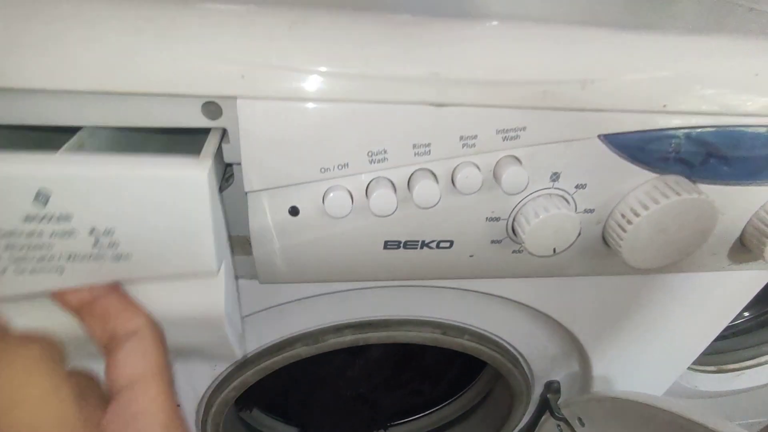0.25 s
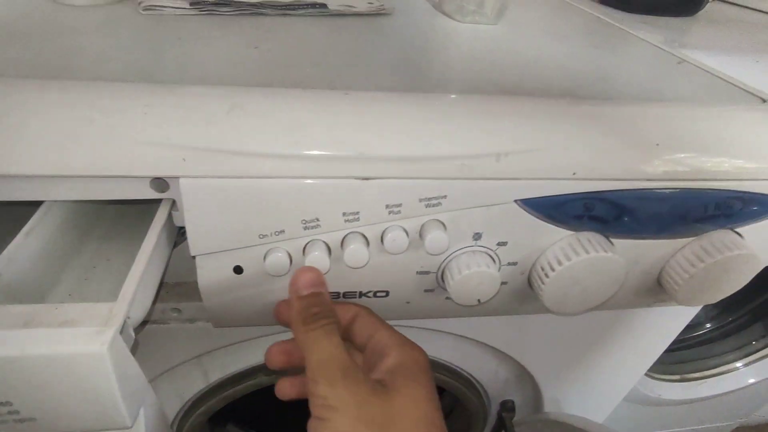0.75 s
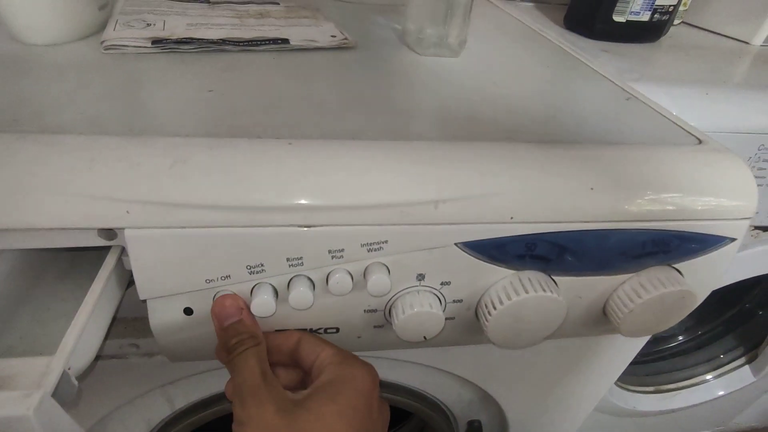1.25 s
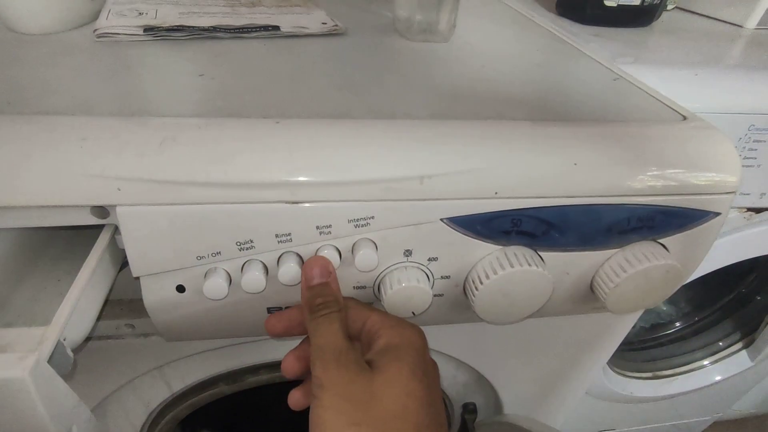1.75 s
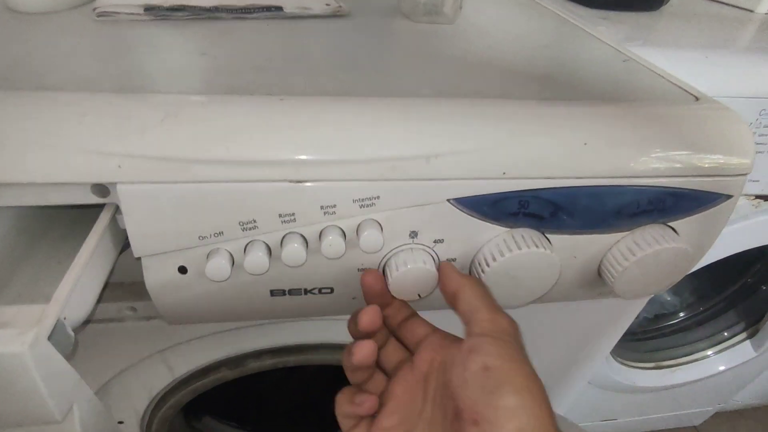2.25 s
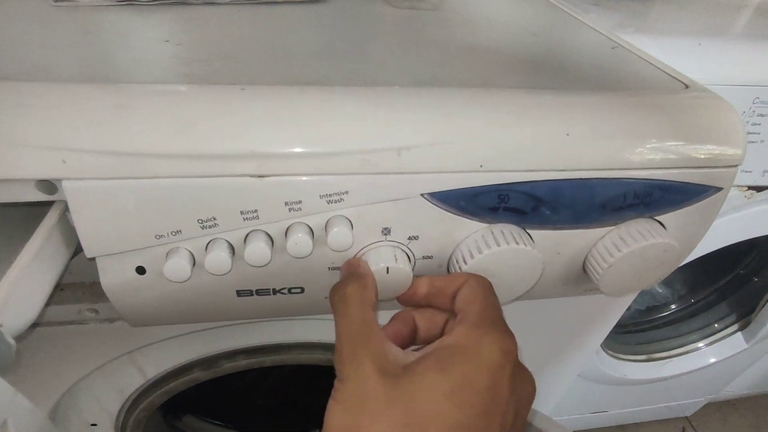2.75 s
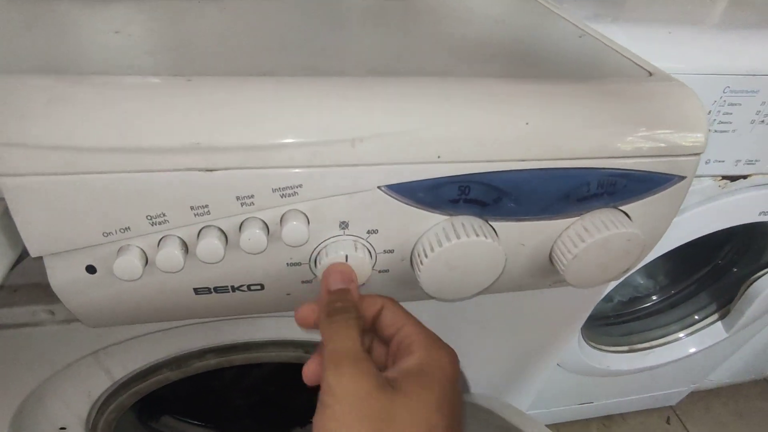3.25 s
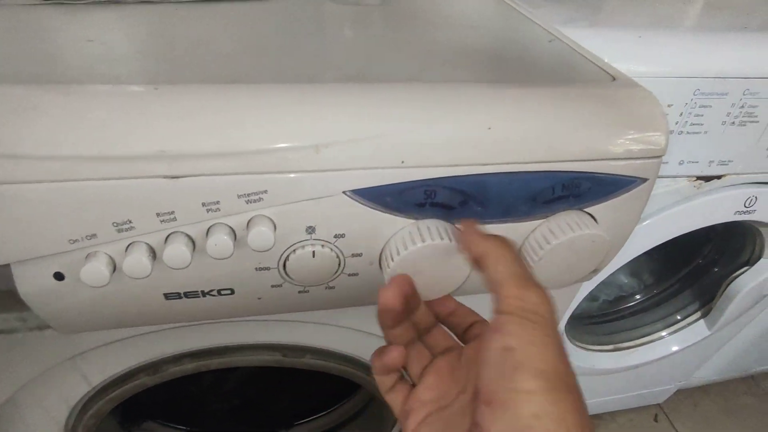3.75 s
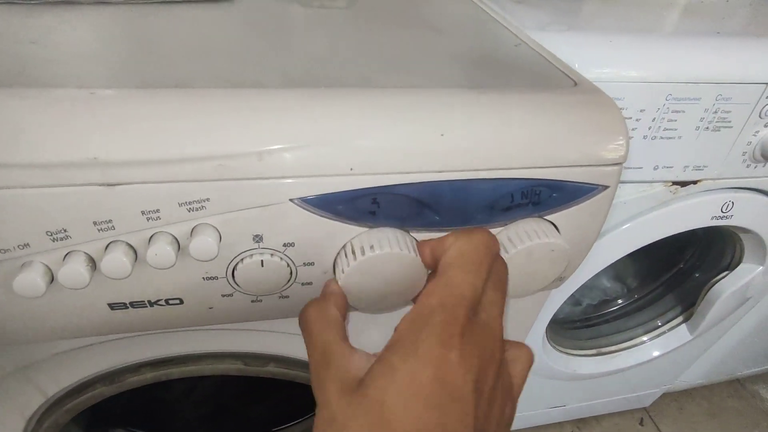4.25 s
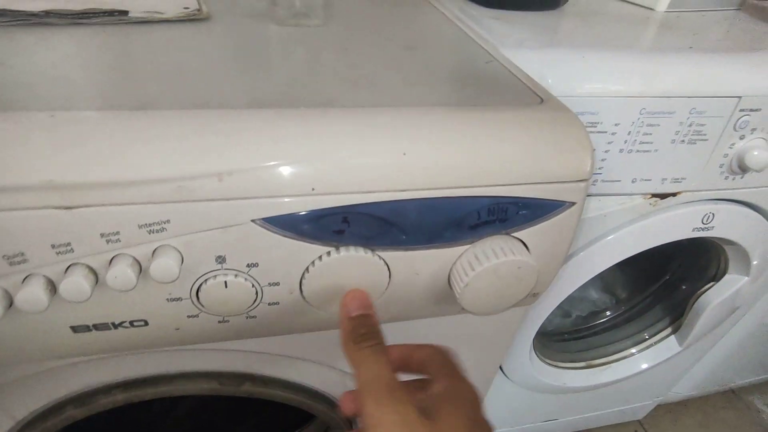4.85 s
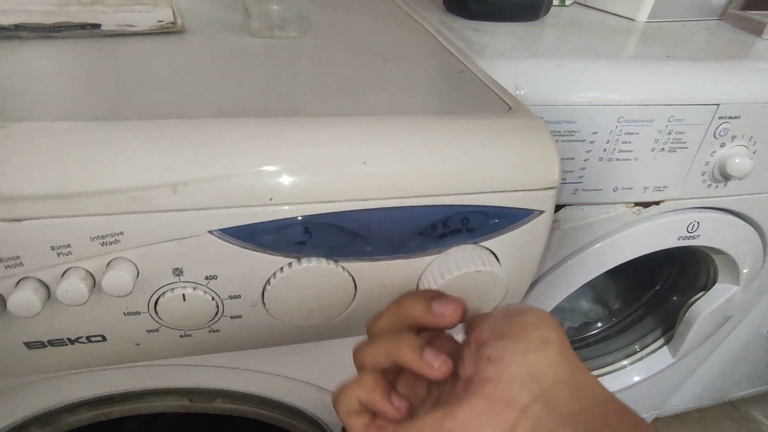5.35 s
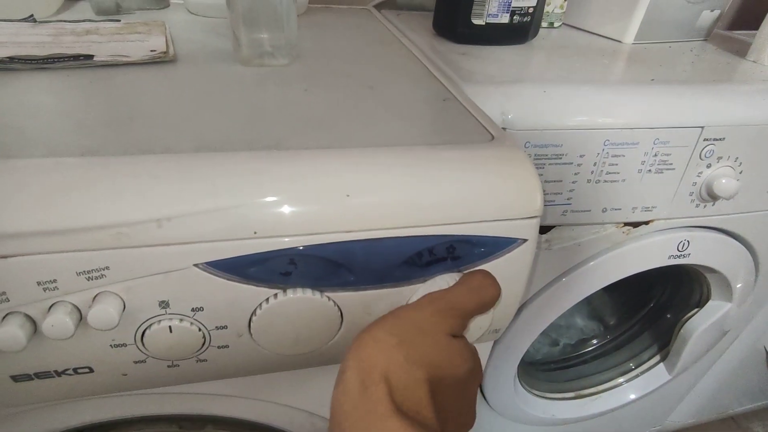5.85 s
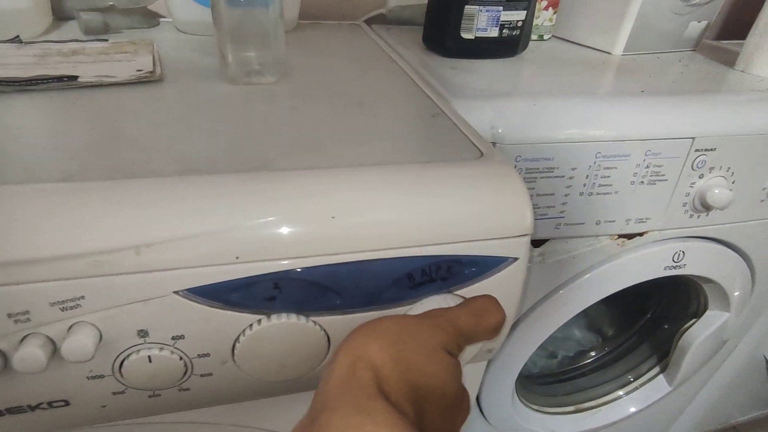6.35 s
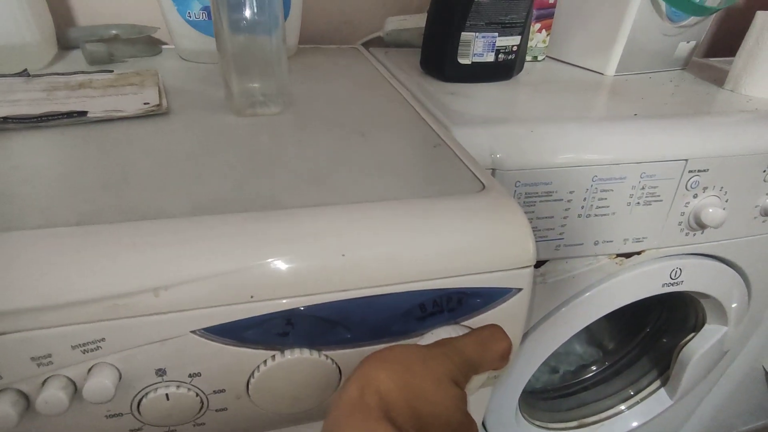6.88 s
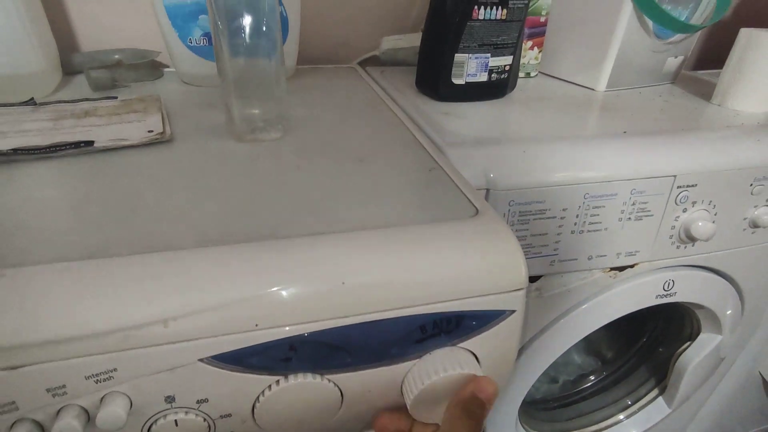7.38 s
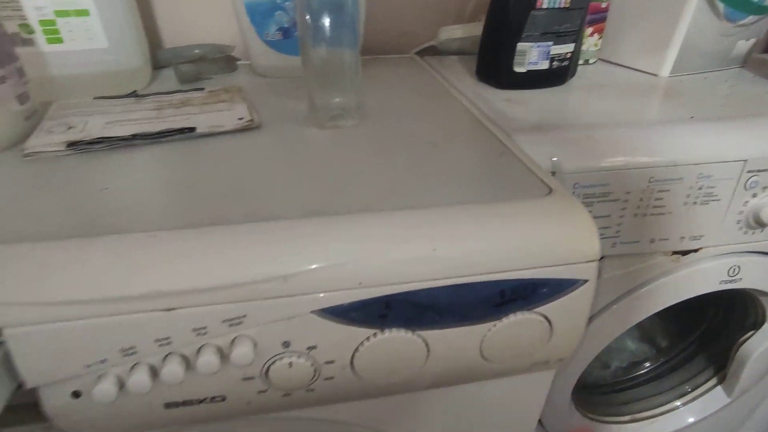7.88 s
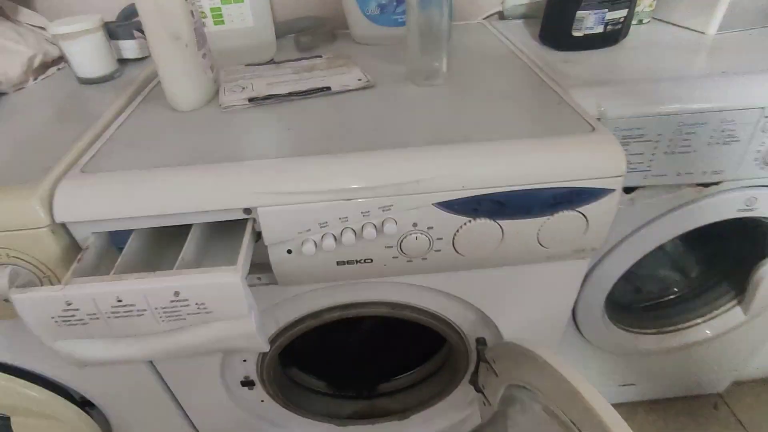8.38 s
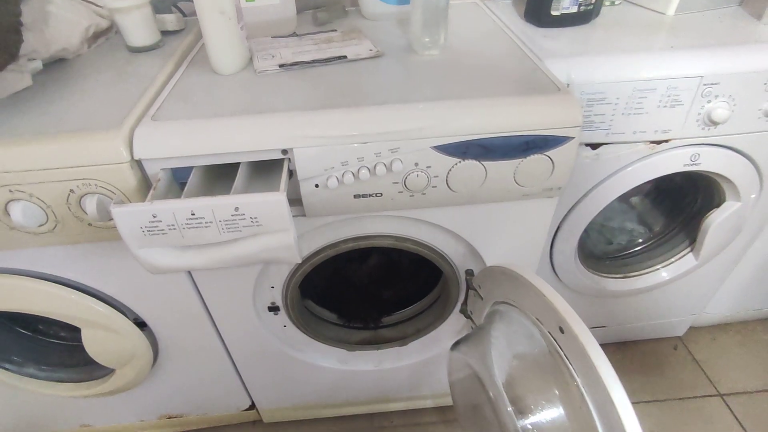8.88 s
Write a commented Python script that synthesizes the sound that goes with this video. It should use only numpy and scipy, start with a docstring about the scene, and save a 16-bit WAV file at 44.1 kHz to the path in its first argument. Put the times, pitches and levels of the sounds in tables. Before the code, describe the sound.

Close-up washing machine controls: soap drawer slides out, buttons snap, knobs click sharply and clunk in a small hard room, ending with slipper scuffs.

```python
"""Snaps, dull knocks and scrapes, close up: a hand pulls out a washing machine's soap drawer,
presses its buttons and turns its three knobs; at the end slippers scuff on the tiles.
Contacts are noise bursts that ring the modes of plastic fascia and steel cabinet or drawer; slides and
soles are shaped grains of noise. A small hard room answers, over quiet background noise and a low drone."""
import sys
import numpy as np
from scipy import signal
from scipy.fft import rfft, irfft, next_fast_len
from scipy.io import wavfile
from scipy.ndimage import map_coordinates

SR = 44100
rng = np.random.default_rng(int(sys.argv[2]) if len(sys.argv) > 2 else 0)


def put_to_file(sound):
    """Save the sound as 16-bit audio at rate SR, in the file named by the first command-line argument."""
    columns = np.atleast_2d(sound).T  # one column per channel
    safe = np.clip(columns, -1, 1)
    whole_steps = np.round(safe * 32767)
    wavfile.write(sys.argv[1], SR, whole_steps.astype(np.int16))


N = 402191

# modes of the plastic front, before the struck spot favours some: f/Hz, level/dB, t60/s
FASCIA_MODES = [(612, -8, 0.064), (647.6, -7, 0.17), (718, 5, 0.028), (815, -5, 0.036), (923, 1.5, 0.033),
                (1024, -3.5, 0.048), (1060, -8.5, 0.04), (1140, 2, 0.015), (1353, 1.5, 0.028),
                (1560, 4, 0.032), (1690, 3, 0.031), (1940, -3.5, 0.016), (2340, -14.5, 0.019)]
# modes of the steel box, likewise: f/Hz, level/dB, t60/s
CABINET_MODES = [(134.4, -5.5, 0.36), (165, -13.5, 0.038), (213.2, -4, 0.32), (254.2, -4.5, 0.15),
                 (293.8, -6, 0.14), (334.5, -6, 0.13), (373.2, -3, 0.082), (431.4, -3, 0.1)]
# modes of the soap drawer's box, likewise: f/Hz, level/dB, t60/s
DRAWER_MODES = [(121.4, -6, 0.28), (196, -2, 0.085), (240.7, 4, 0.125), (281, 1.5, 0.12), (309, 0, 0.1),
                (436, -8, 0.025)]
DRAWER_OUT = .6  # the drawer is left alone after this moment (s)
DRUM, TRAY, DIAL, TIMER = 214, 361, 652, 689  # pitches of long thin rings (Hz)
THROB = 27  # beat rate of the timer's ring (Hz)


def amp(db):
    """Gain of a level in dB."""
    return 10 ** (np.asarray(db) / 20)


def unit(x):
    """x at rms 1."""
    return x / np.sqrt(np.mean(x ** 2) + 1e-20)


def along(points, hz):
    """Values at hz, read from (Hz, value) points on a log frequency axis."""
    f, v = np.transpose(points)
    return np.interp(np.log(hz + 1), np.log(f + 1), v)


def curves(rows):
    """One value per sample for each column after the time."""
    s, *cols = np.transpose(rows)
    return [np.interp(np.arange(N) / SR, s, c) for c in cols]


def wobble(rate):
    """A smooth random curve with rate knots a second."""
    knots = rng.standard_normal(int(N * rate / SR) + 4)
    return map_coordinates(knots, [np.arange(N) * rate / SR])


def filtered(x, response):
    """x times a complex response of frequency, with padding for the ringing."""
    n = x.shape[-1]
    m = next_fast_len(n + min(n // 2, 16384))
    return irfft(rfft(x, m) * response(np.fft.rfftfreq(m, 1 / SR)), m)[..., :n]


def resonance(f, hz, width):
    """Response of a causal resonance at hz with peak gain 1."""
    return 1j * f * width / (hz * hz - f * f + 1j * f * width)


def diffuse(pair, spectrum):
    """Colour two signals and blend them so that left and right agree in the bass and part in the treble."""
    # diffuse sound at two microphones: f/Hz, left-right likeness (1 = identical)
    likeness = [(60, 0.98), (250, .8), (600, 0.36), (1400, 0.18), (3000, .02)]

    def blend(hz):
        turn = np.arccos(np.clip(along(likeness, hz), -1, 1)) / 2
        return amp(along(spectrum, hz)) * [np.cos(turn), np.sin(turn)]
    mid, side = filtered(pair, blend)
    return np.array([mid + side, mid - side])


def struck(modes, t, attack, scatter_db, octave_db):
    """A body to strike: modes near the struck spot's pitch ring most; each blow draws strengths and phases."""
    hz, db, t60 = np.transpose(modes)
    dying = amp(-60 * t / t60[:, None]) * np.exp(2j * np.pi * hz[:, None] * t)
    dying = dying * (1 - np.exp(-t / attack))

    def blow(centre_hz):
        """One blow at peak 1; modes lose octave_db for each octave from centre_hz."""
        draw = rng.standard_normal((2, len(hz)))
        mode_db = db + scatter_db * draw[0] - octave_db * np.abs(np.log2(hz / centre_hz))
        x = np.imag((amp(mode_db) * np.exp(1j * draw[1])) @ dying)
        return x / np.max(np.abs(x))
    return blow


def stroke(start, swell, fade, db, swell_db, landing):
    """Samples and gain of a rubbing stroke: it lands, swells to a rounded top and fades."""
    FADE_DB, BEND = 28.5, 1.23  # depth of the fade; roundness of the top
    first, last = round(start * SR), min(N, round((start + swell + fade) * SR))
    t = np.arange(first, last) / SR - start - swell  # 0 at the top
    rising = swell_db * np.abs(t / swell) ** BEND
    falling = FADE_DB * np.abs(t / fade) ** BEND
    gain = amp(db - np.where(t < 0, rising, falling)) * np.clip((t + swell) / landing, 0, 1) ** 2
    return slice(first, first + len(t)), gain


def contacts():
    """Each contact is a rattling snap, a dull knock, the part's own ring and the modes of the bodies it hits."""
    # contacts of drawer, buttons, detents and fingers; the last is a tick of grit underfoot.
    # Levels before panning: t/s, snap peak/dB, snap colour f/Hz, fascia re snap/dB,
    # fascia spot f/Hz, cabinet or drawer re snap/dB
    hits = [(0.0819, -36.5, 6500, -18, 587, -19), (0.0947, -35.5, 2850, -7, 552, 1),
            (0.111, -42, 3840, 14.5, 990, 10), (0.2434, -17, 3420, -6.5, 880, -12.5),
            (0.4109, -48.5, 3850, 6, 1590, 14.5), (.452, -41, 3000, -2.5, 1600, 1),
            (0.4703, -56.5, 3970, -12, 821, 21.5), (0.7915, -45, 2340, 8, 710, -4.5),
            (1.0577, -58, 4290, 7, 950, -12), (1.084, -64, 2310, 16.5, 923, -9),
            (1.2055, -67, 3000, 8, 940, -6), (1.2314, -43.5, 3900, -0.5, 940, -27),
            (1.261, -57, 3020, 6.5, 900, -3), (1.28, -46.5, 4000, -0.5, 953, -21),
            (1.292, -46.5, 5310, -10, 1030, -7), (1.319, -47.5, 4000, 7.5, 940, 0),
            (1.425, -50.5, 3740, 9.5, 961, -12), (1.4494, -32.5, 5160, -8, 955, -32),
            (1.468, -11.5, 3890, -4, 825, -25.5), (1.8733, -42.5, 4640, -5.5, 651, -4.5),
            (1.8983, -41.5, 2340, 10.5, 687, -1.5), (1.9942, -46, 2690, 10, 917, 8.5),
            (2.0504, -25, 3225, -25, 616, -10), (2.0532, -18, 3420, -5.5, 665, -19.5),
            (2.3019, -58, 3610, 7.5, 647, 5), (2.3492, -48, 2460, 4.5, 670, -7),
            (2.37, -34.5, 2893, -1, 881, -9.5), (2.4621, -19.5, 3460, 2.5, 1205, -13),
            (2.4667, -3.5, 3300, -12.5, 1060, -29.5), (2.5025, -13, 3424, -0.5, 867, -13.5),
            (2.5075, -10.5, 4020, -10, 994, -28.5), (2.6361, -10.5, 4033, -3.5, 1140, -19.5),
            (2.7264, -7.5, 3274, -13.5, 1730, -28), (2.733, -11, 3280, -6.5, 1500, -23),
            (2.7426, -18, 3530, 0, 704, -17.5), (3.0131, -61, 2180, 15.5, 659, 19.5),
            (3.0603, -48, 2570, 10, 918, 5), (3.1284, -36, 6660, -9, 670, -15),
            (3.2899, -41, 3000, 10, 895, 3.5), (3.378, -15, 2260, -9, 895, -17.5),
            (3.497, -24, 7190, -9, 688, -11), (3.59, -36.5, 4480, -1, 670, 1), (3.78, -54, 3730, 6, 690, 5),
            (3.8468, -56, 6340, 13, 675, 21), (3.9493, -44, 3660, 16.5, 640, 10),
            (3.9982, -44, 3000, 6.5, 500, 10), (4.0095, -38.5, 3050, 10, 641, -4),
            (4.0593, -35, 4000, -3.5, 800, -2.5), (4.0895, -26.5, 4000, 1, 773, -12.5),
            (4.11, -28.5, 4550, 0.5, 770, -5.5), (4.1655, -22.5, 4200, -9, 900, -18),
            (4.182, -31.5, 3980, 3, 700, -4), (4.2592, -27.5, 7480, -5.5, 1610, -20),
            (4.2748, -23.5, 3380, 2.5, 711, 0.5), (4.311, -38, 3780, 12, 700, 7.5),
            (4.4132, -48, 2270, 9.5, 656, -9.5), (4.473, -50.5, 4390, 12.5, 884, 10),
            (4.686, -43.5, 2300, 15.5, 646, 14.5), (4.6935, -25, 2260, 9.5, 947, -9),
            (4.6973, -27, 1704, 7, 953, 4.5), (4.748, -37, 3000, 9.5, 700, 7.5),
            (4.7701, -12, 6820, -13.5, 646, -25.5), (4.7745, -30.5, 3040, 12, 680, 0),
            (4.789, -35.5, 3000, 5.5, 600, 7.5), (4.845, -18.5, 6940, -20.5, 665, -15),
            (4.857, -26.5, 3165, 4, 900, -7), (5.1225, -46, 2360, 3, 977, 0),
            (5.2407, -32.5, 2910, 2, 748, -19.5), (5.2597, -17, 6360, -5.5, 764, -17.5),
            (5.2754, -7.5, 2976, -6.5, 996, -16.5), (5.2976, -20.5, 3110, 1.5, 744, -9),
            (5.3436, -14, 3910, -3, 651, -3), (5.565, -44.5, 3900, -1, 683, -0.5),
            (5.791, -49.5, 3560, 3, 684, 2), (5.862, -56.5, 2790, 10.5, 656, 11),
            (5.9828, -22.5, 5540, -4.5, 1482, -13.5), (5.991, -24, 3490, -0.5, 1650, -9),
            (6.112, -24.5, 8600, -10, 1030, -38), (6.1331, -26, 2220, -5.5, 680, -28),
            (6.202, -22.5, 6270, 1.5, 1060, -9.5), (6.376, -39.5, 2510, 3, 900, 1),
            (6.3864, -19.5, 2357, -3, 940, -20), (6.4149, -19.5, 2930, -2, 1060, -8.5),
            (6.4229, -27.5, 3000, -7, 1060, -5), (6.849, -71, 3000, 11, 900, 1),
            (6.9118, -65, 4970, 6.5, 643, 9), (7.0123, -51, 2510, 1.5, 579, 7),
            (7.0474, -34, 3950, -2.5, 668, -13.5), (7.062, -19, 5750, -18.5, 1060, -39.5),
            (7.293, -46.5, 3860, -4, 714, -9.5), (7.3721, -39, 4000, 4, 742, -1),
            (7.5001, -54.5, 2990, 11, 700, 9), (7.5323, -36.5, 2490, 9.5, 700, 9.5),
            (7.606, -8.5, 4470, -5, 715, -18.5), (7.611, -28, 3000, -1.5, 900, -5.5),
            (7.721, -21.5, 9170, -18, 740, -11), (8.74, -36.5, 3560, -31, 1594, -36)]
    # the part in hand from each time on: from t/s, cabinet or drawer spot f/Hz,
    # top re snap/dB (for a -26.5 dB snap), snap t60/s, snap rise/s, upper edge f/Hz (for a -24.5 dB snap),
    # mean right over left/dB, own ring f/Hz, its width/Hz, its level re fascia/dB, dull knock re fascia/dB
    parts = [(0, 248, -19.5, 0.02, 0.0012, 8000, 8.5, 990, 200, -11, -8.5),
             (.6, 217, 1, 0.028, 0.002, 6000, 3.5, 1390, 250, 0.5, -2),
             (.9, 217, -3.5, 0.034, 0.00044, 8000, 5, 923, 70.5, 0, -12),
             (1.46, 220, -3.5, 0.05, 0.00058, 8030, 4, 720, 202.6, -6, -16),
             (1.7, 215, -2.5, 0.053, 0.00079, 7950, 4, 695, 120, -9, -10),
             (2.25, 416, -18, 0.028, 0.00058, 7900, 2.5, 1154, 204, -12, -1.5),
             (3.7, 253, -10.5, 0.028, 0.0014, 9000, 4.5, 750, 250, -17, -6.5),
             (4.6, 214, -17, 0.017, 0.00041, 11800, 4.5, 920, 100.5, -12.5, -1),
             (5.1, 304, -7.5, 0.028, 0.0012, 10000, 3.5, 1068, 80, -6, -14.5),
             (5.9, 340, -10, 0.036, 0.0035, 7900, 5, 1038, 70, -1.5, -8.5),
             (7.25, 325, 3, 0.023, 0.00056, 10000, 2.5, 688, 160, -9, -2)]
    TOP_PER_DB = 0.12  # dB of extra top for each dB of snap
    DULLER_PER_DB = 0.1  # octaves the upper edge drops for each dB softer
    out, t = np.zeros((2, N + SR)), np.arange(SR // 3) / SR
    short = t[:3072]
    fascia = struck(FASCIA_MODES, t, 0.00069, 2.8, 10.1)
    cabinet = struck(CABINET_MODES, t, 0.0026, 2.5, 8)
    drawer = struck(DRAWER_MODES, t, 0.0051, 2.9, 13)
    for s, db, hz, fascia_db, fascia_hz, body_db in hits:
        part = [row for row in parts if row[0] <= s][-1]
        _, body_hz, top_db, t60, rise, sharp_hz, pan_db, own_hz, own_width, own_db, knock_db = part
        top_db += TOP_PER_DB * (db + 26.5)
        edge_hz = sharp_hz * 2 ** (DULLER_PER_DB * (db + 24.5))  # soft contacts are dull

        decay = amp(-60 * short / t60) + 0.39 * amp(-60 * short / 0.0015)
        burst = rng.standard_normal((3, len(short))) * decay * (1 - np.exp(-short / rise))
        burst = burst[0] + 2.54 * burst[1:]  # left and right face different sides of the part

        def snap_colour(f):
            body = 0.58 * (4000 / hz) ** 0.31 * resonance(f, 1700, 4800)
            peaks = body + resonance(f, hz, hz / 2) + amp(top_db) * resonance(f, 8400, 4100)
            return peaks * f / (f - 1500j) / (1 + 1j * f / edge_hz) / (1 + 1j * f / 11000)
        snap = filtered(burst, snap_colour)
        knock = filtered(burst, lambda f: resonance(f, fascia_hz, 1.4 * fascia_hz) ** 2)
        own = filtered(burst[0], lambda f: resonance(f, own_hz, own_width))

        # on average louder on the right, with some scatter
        side = amp((pan_db / 2 + 0.63 * rng.standard_normal()) * np.array([[-1], [1]]))
        at = round(s * SR)
        brief, ringing = out[:, at:at + len(short)], out[:, at:at + len(t)]
        brief += amp(db) * side * snap / np.max(np.abs(snap))
        brief += amp(db + fascia_db + knock_db) * side ** 0.97 * knock / np.max(np.abs(knock))
        brief += amp(db + fascia_db + own_db) * side * own / np.max(np.abs(own))
        ringing += amp(db + fascia_db) * side ** 1.4 * fascia(fascia_hz)
        body = drawer if s < DRAWER_OUT else cabinet
        ringing += amp(db + body_db) * body(body_hz)
    return out[:, :N]


def pawl():
    """A hard pawl clicks as a knob locks in: stiff little modes die within milliseconds."""
    # lock-in clicks: t/s, peak before panning/dB, left over right/dB, colour f/Hz
    locks = [(4.7696, -2.5, -4.5, 6380), (4.845, -15, -7, 6420), (7.603, -1, 0.5, 7370),
             (7.7198, -14.5, -3, 4160)]
    # modes of the pawl, before the click's colour favours some: f/Hz, level/dB, t60/s
    pawl_modes = [(3980, -1, 0.0097), (5240, -7, 0.0031), (6500, -1.5, 0.013), (7300, -2, 0.0056),
                  (8400, -9.5, 0.0049), (9940, -1, 0.0078), (12150, -1.5, .006), (13250, -2, 0.0067),
                  (14600, -6, .005)]
    out, t = np.zeros((2, N + SR)), np.arange(2048) / SR
    click = struck(pawl_modes, t, 0.000092, 4.6, 1.3)
    for s, db, pan, hz in locks:
        level = amp(db + np.array([[pan / 2], [-pan / 2]]))
        pair = [click(hz), click(hz)]  # drawn afresh for each side
        out[:, round(s * SR):][:, :len(t)] += level * pair
    return out[:, :N]


def slides():
    """Stick-slip grains scrape in the treble and drive the modes of fascia and cabinet, or of the drawer."""
    # buttons and knobs sliding in their seats, levels at the top before panning: start t/s, swell/s,
    # fade/s, scrape/dB, fascia re scrape/dB, cabinet re scrape/dB
    rubs = [(.945, 0.016, 0.066, -60, -6, -10), (1.05, 0.041, 0.038, -83, 14, 9),
            (1.22, 0.095, 0.092, -58, 1, 0.5), (1.401, 0.068, 0.0047, -43.5, -8.5, -1),
            (1.86, 0.033, 0.038, -55, 11, 9.5), (1.961, 0.11, 0.0053, -45.5, 3, -6.5),
            (3.284, 0.016, 0.1, -51, 7, 4), (3.33, 0.041, 0.12, -45.5, 6, 4.5),
            (3.489, 0.0084, 0.13, -45.5, 8, 6.5), (3.941, 0.18, 0.051, -43.5, 4.5, 4.5),
            (4.084, .012, 0.053, -44, 0.5, -9), (4.162, 0.0094, 0.036, -49, -2, -5.5),
            (4.15, 0.017, 0.13, -40.5, 3, 6), (4.223, 0.058, 0.036, -42.5, 6.5, 7),
            (4.33, 0.087, 0.2, -67, 4.5, 16.5), (4.688, 0.0079, 0.11, -41, 4.5, 7),
            (4.735, 0.03, 0.035, -37.5, 3, 10.5), (5.246, 0.049, 0.13, -19, 1.5, -6),
            (5.975, 0.0071, 0.13, -36.5, -4, -12), (6.099, 0.02, 0.14, -41, 2, -6.5),
            (6.192, 0.017, 0.07, -32, -3.5, -4.5), (6.368, 0.045, 0.14, -38, 0, -2.5),
            (7.013, 0.075, 0.061, -49, 3.5, 1.5), (7.522, 0.033, 0.11, -38, 6, -3),
            (7.602, 0.015, 0.17, -46, 0, 3)]
    # the drawer coming out, before panning: t/s, scrape level/dB, drawer box re scrape/dB
    pull = [(.04, -63, -23), (.1, -47.5, 11.5), (.14, -54.5, 16.5), (.21, -48.5, 3), (.238, -46.5, 13),
            (.26, -51.5, 16), (.33, -44.5, -4), (.39, -48, -5.5), (.45, -45, -2), (.475, -54, -3),
            (.53, -59.5, -8.5)]
    # colour of the scrape: f/Hz, relative level per Hz/dB
    scrape_colour = [(940, -17), (1600, 2), (1980, -5.5), (4420, -3.5), (6530, -7), (10300, -11),
                     (15300, -38.5), (15900, -33.5), (16500, -105.5)]
    SWELL_DB, GRIP_S = 27.5, 0.0023  # how far a slide swells; how soon it takes hold (s)
    grains = amp(2.5 * wobble(260) + 0.96 * wobble(45)) * rng.standard_normal((3, N))

    def driven(table):
        """Response of a body's modes, alternating in sign."""
        return lambda f: sum((-1) ** k * amp(db) * resonance(f, hz, 5.77 / t60)
                             for k, (hz, db, t60) in enumerate(table))
    scrape = unit(filtered(grains[0] + 2.7 * grains[1:], lambda f: amp(along(scrape_colour, f))))
    fascia = unit(filtered(grains[0] + .5 * grains[1:], driven(FASCIA_MODES)))
    cabinet = unit(filtered(grains[0], driven(CABINET_MODES)))

    out = np.zeros((2, N))
    pulled = slice(round(pull[0][0] * SR), round(pull[-1][0] * SR))
    db, box_db = [curve[pulled] for curve in curves(pull)]
    box = unit(filtered(grains[0, pulled], driven(DRAWER_MODES)))
    out[:, pulled] = amp(db) * (scrape[:, pulled] + amp(box_db) * box)
    for *when, fascia_db, cabinet_db in rubs:
        span, gain = stroke(*when, SWELL_DB, GRIP_S)
        bodies = amp(fascia_db) * fascia[:, span] + amp(cabinet_db) * cabinet[span]
        out[:, span] += gain * (scrape[:, span] + bodies)
    return out * amp([[-1.8], [1.8]])


def springs():
    """Thin sine rings hang on after some contacts; the timer's has a close partner and throbs."""
    # long rings, before panning and attack: t/s, f/Hz, level/dB, t60/s
    rings = [(1.897, DRUM, -42.5, 1), (2.467, DIAL, -57, 0.8), (2.726, DIAL, -44.5, 1.03),
             (4.276, DRUM, -38, 1.94), (4.72, DRUM, -35.5, 0.54), (4.755, DRUM, -27.5, 0.91),
             (4.899, TRAY, -39, 0.72), (5.3, TIMER, -41, 1.45), (5.346, DRUM, -32.5, 0.66),
             (5.985, DRUM, -68, 0.53), (5.985, TIMER, -52, 1.2), (6.203, TIMER, -41.5, 0.67),
             (6.415, TIMER, -42, 1.32), (6.417, DRUM, -49.5, 1.16), (7.565, DRUM, -30, 0.22),
             (7.603, TIMER, -65, 2), (7.616, 137, -29.5, 0.35), (7.72, 255, -50, 1.04),
             (7.72, 315, -53, 1.36)]
    out, t = np.zeros(N + 2 * SR), np.arange(2 * SR) / SR
    for s, hz, db, t60 in rings:
        tone = np.sin(2 * np.pi * hz * t)
        if hz == TIMER:
            tone += .6 * np.sin(2 * np.pi * (hz - THROB) * t)
        out[round(s * SR):][:len(t)] += amp(db - 60 * t / t60) * tone * (1 - np.exp(-t / 0.0042))
    return out[:N] * amp([[-1], [1]])


def scuffs():
    """Soles drag over the tiles: fine grit, plus the hollow resonance of the slipper."""
    # drags, levels at the top before panning: start t/s, swell/s, fade/s, sole/dB, swell depth/dB,
    # landing/s, hollow re sole/dB
    drags = [(8.11, 0.22, .15, -35.5, 11, 0.0496, -9), (8.43, 0.22, 0.32, -45.5, 23.5, 0.049, -5),
             (8.858, 0.063, 0.16, -40, 8, 0.0092, -9)]
    # colour of the grit: f/Hz, relative level per Hz/dB
    sole_colour = [(410, -25), (700, -12.5), (863, -16), (984, -9), (1200, -11), (1560, -11), (2020, -5),
                   (4490, -2.5), (5540, -8.5), (6570, -4), (7200, -9.5), (8310, -5), (14600, -16.5),
                   (16000, -34)]
    grit = amp(0.49 * wobble(300) + 1.3 * wobble(35)) * rng.standard_normal((2, N))
    sole = unit(diffuse(grit, sole_colour))
    hollow = unit(filtered(grit, lambda f: resonance(f, 1620, 887) ** 2))
    out = np.zeros((2, N))
    for *when, hollow_db in drags:
        span, gain = stroke(*when)
        out[:, span] += gain * (sole[:, span] + amp(hollow_db) * hollow[:, span])
    return out * amp([[-.8], [.8]])


def air():
    """Quiet background noise, slightly unsteady, and a low drone from far away, both diffuse."""
    # colour of the quiet background noise, band-limited near 15.5 kHz: f/Hz, relative level per Hz/dB
    hush_colour = [(40, -41), (70, -17.5), (100, -1), (130, 4.5), (170, -2.5), (300, -2.5), (500, -9),
                   (680, -8), (1000, -14.5), (1500, -16), (2200, -23.5), (4000, -23.5), (10000, -31.5),
                   (15200, -32), (15800, -54)]
    # course of the drone, before its wobble and panning: t/s, level/dB
    drone_course = [(0, -73), (2.3, -78.5), (2.8, -71.5), (3.8, -83.5), (5.9, -72.5), (6.4, -68.5),
                    (7.7, -64), (9.12, -83)]
    # colour of the drone: f/Hz, relative level per Hz/dB
    drone_colour = [(20, -31.5), (35, -22), (55, 3.5), (80, -0.5), (120, -29), (300, -120)]
    hush_db = -58.5 + 0.42 * wobble(0.74) + 0.33 * wobble(0.47)
    hush = amp(hush_db) * unit(diffuse(rng.standard_normal((2, N)), hush_colour))
    drone_db = curves(drone_course)[0] + 2.7 * wobble(3.4)
    drone = amp(drone_db) * unit(diffuse(rng.standard_normal((2, N)), drone_colour))
    return (hush + drone) * amp([[-.6], [.6]])


def room(x):
    """Hard walls: noise tails in which each frequency dies at its own speed, renewed every quarter second."""
    # decay of the tail: f/Hz, t60/s
    decay = [(125, 0.35), (500, 0.47), (2000, 0.36), (6000, 0.35), (14000, 0.23)]
    # colour of the echoes: f/Hz, level re direct energy/dB
    echo_colour = [(125, -1), (500, -1.5), (1200, -3), (2500, -0.5), (6000, -2.5), (14000, -1)]
    EARLY_DB, EARLY_T60 = -6.5, 0.13  # first echoes off near surfaces: dB re the tail's start, s
    DRIFT_S = .00007  # the echoes shift in time by about this much (s)
    step, out = SR // 4, np.zeros((2, N + 2 * SR))
    for at in range(0, N, step):
        hz, t, z = signal.stft(rng.standard_normal((2, SR * 3 // 4)), SR, nperseg=256)
        fall = amp(-60 * t / along(decay, hz)[:, None]) + amp(EARLY_DB - 60 * t / EARLY_T60)
        fall /= np.linalg.norm(fall, axis=1)[:, None]  # equal energy at every frequency
        tail = signal.istft(z * fall, SR, nperseg=256)[1] / np.sqrt(128)
        wet = signal.fftconvolve(x[None, at:at + step], tail, axes=1)
        out[:, at + 200:at + 200 + wet.shape[1]] += wet  # the echoes begin 200 samples late
    # echoes waver slightly in time and level, so that no thin tones hang in the tail
    drift = np.arange(N) + DRIFT_S * SR * np.array([wobble(90), wobble(90)])
    out = np.array([map_coordinates(side, [when]) for side, when in zip(out, drift)])
    waver_db = 1.4 * np.array([wobble(70), wobble(70)])
    return diffuse(out * amp(waver_db), echo_colour)


def scene():
    """The machine, near and a little to the right, in its room, with the scuffs and background noise."""
    SMALL_HZ = 80  # the machine radiates little below this
    LAG = 6  # samples by which the left side hears the machine later
    machine = filtered(contacts() + slides(), lambda f: f / (f - 1j * SMALL_HZ))
    clicks = pawl()
    near = machine + clicks
    direct = np.array([np.roll(near[0], LAG), near[1]])
    # the pawl's clicks stay dry: less of them goes into the room
    to_room = (machine + amp(-5.0) * clicks).mean(axis=0)
    return direct + room(to_room) + springs() + scuffs() + air()


def record(dry):
    """The microphones round off the highest peaks, lose the deep bass and keep nothing above a band limit."""
    CEILING, BASS_HZ, TOP_HZ = .85, 45, 16800  # full scale = 1; Hz; Hz
    rounded = dry / (1 + np.abs(dry / CEILING) ** 4) ** (1 / 4)
    return filtered(rounded, lambda hz: (hz / (hz - 1j * BASS_HZ)) ** 2 * (hz < TOP_HZ))


dry = scene()
out = record(dry)
put_to_file(out)
```